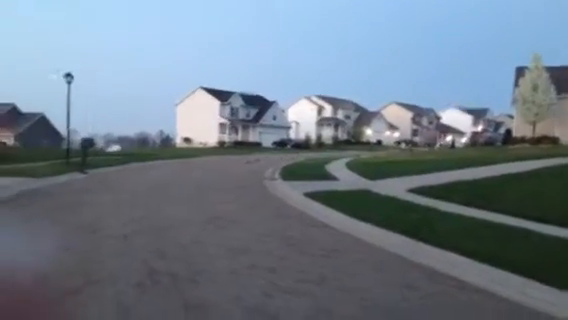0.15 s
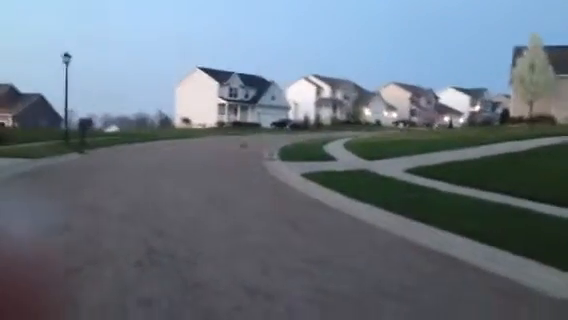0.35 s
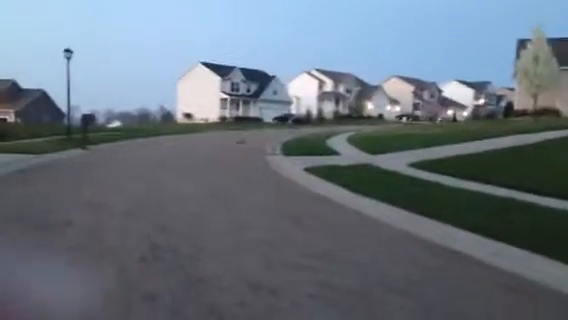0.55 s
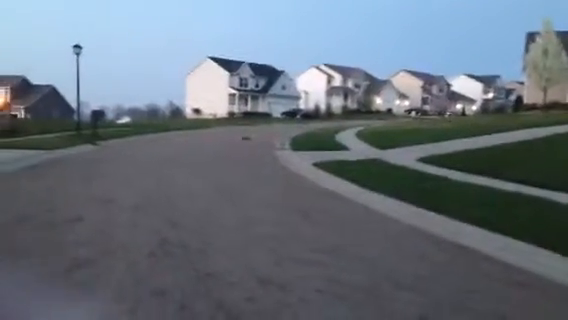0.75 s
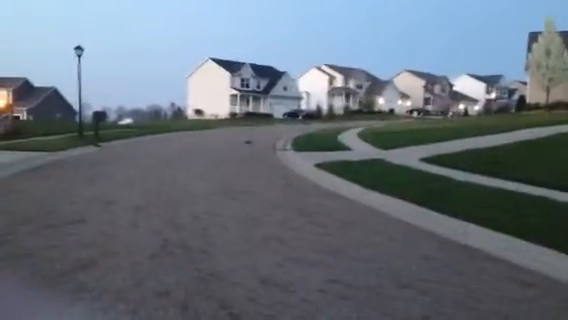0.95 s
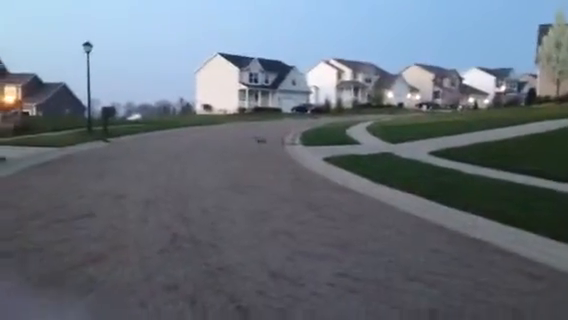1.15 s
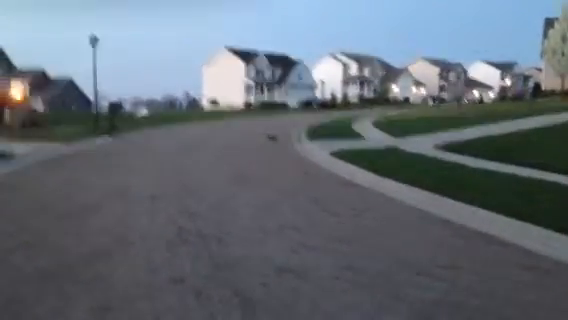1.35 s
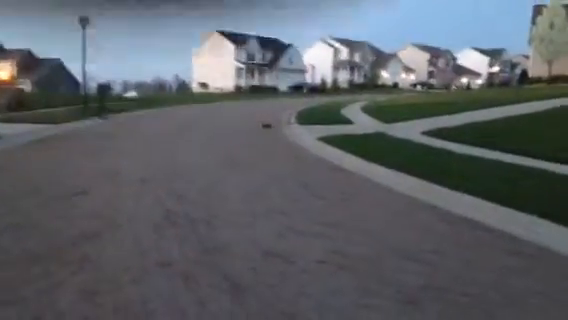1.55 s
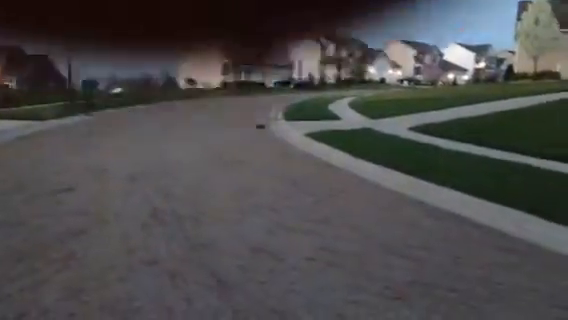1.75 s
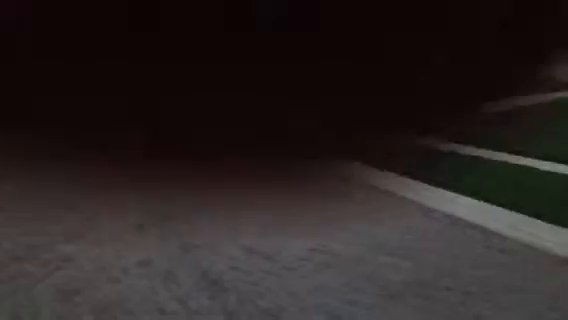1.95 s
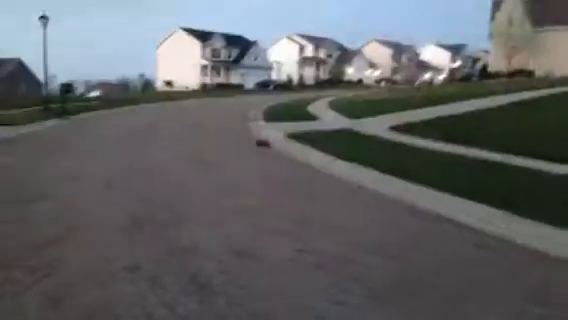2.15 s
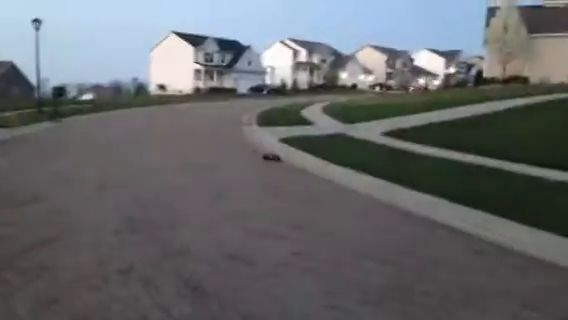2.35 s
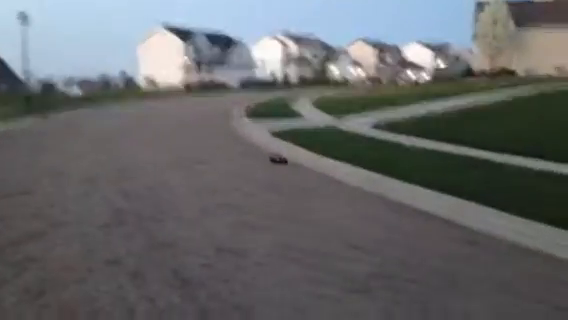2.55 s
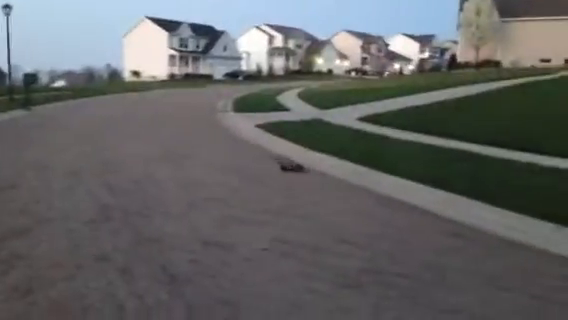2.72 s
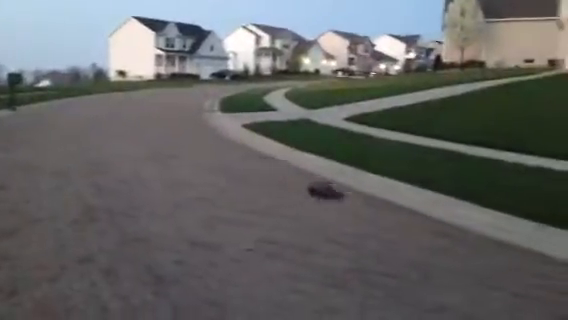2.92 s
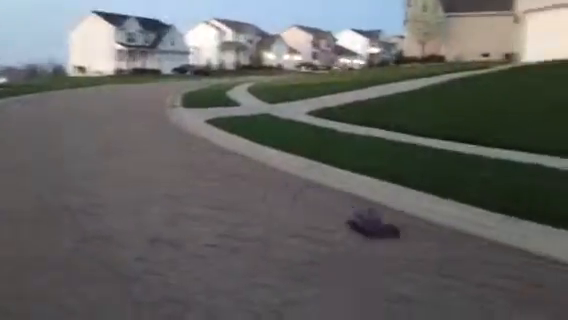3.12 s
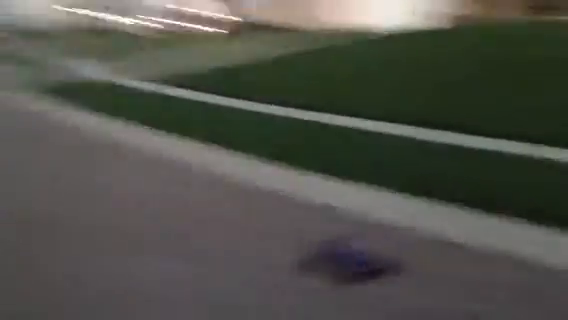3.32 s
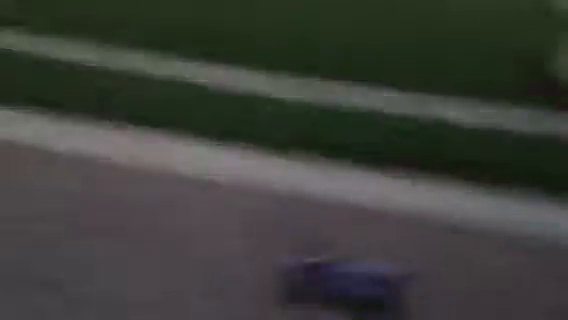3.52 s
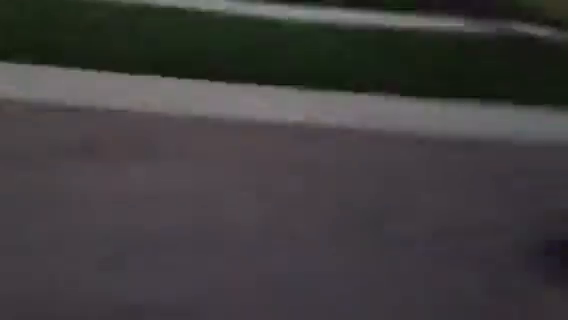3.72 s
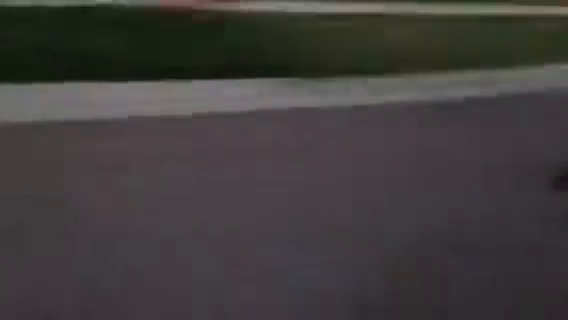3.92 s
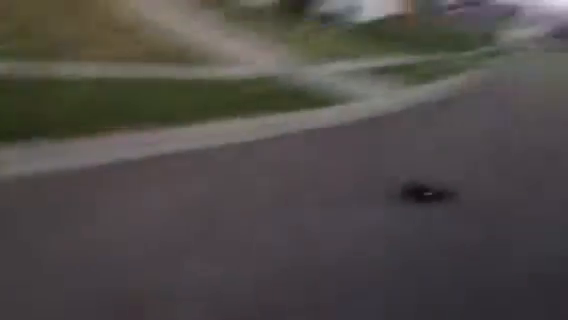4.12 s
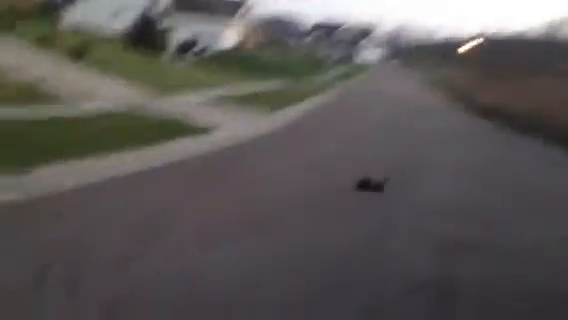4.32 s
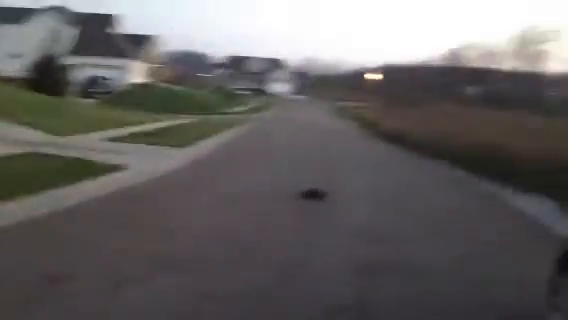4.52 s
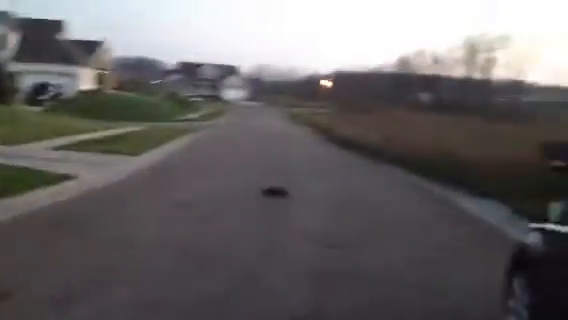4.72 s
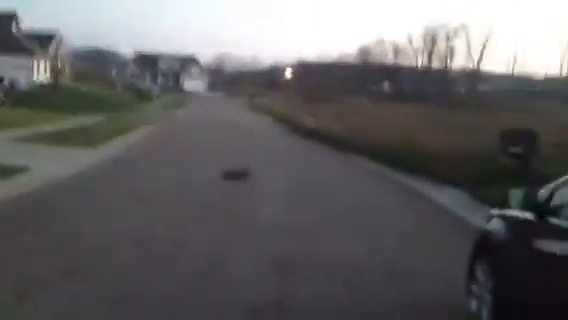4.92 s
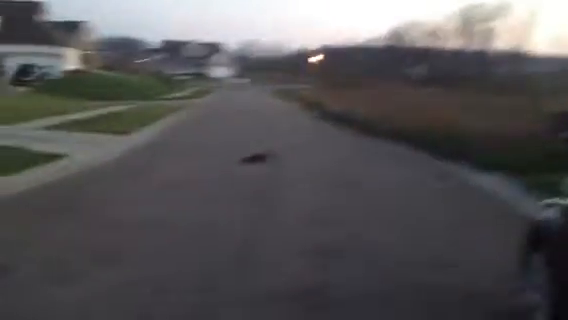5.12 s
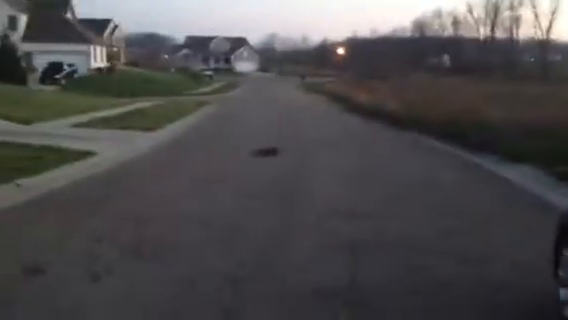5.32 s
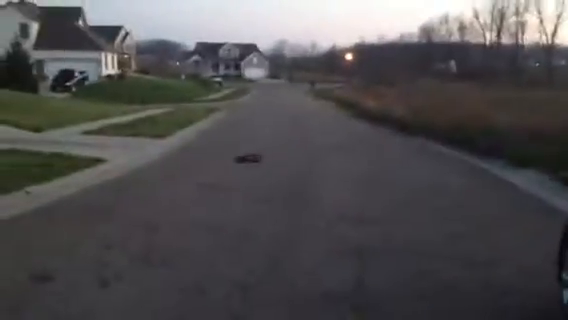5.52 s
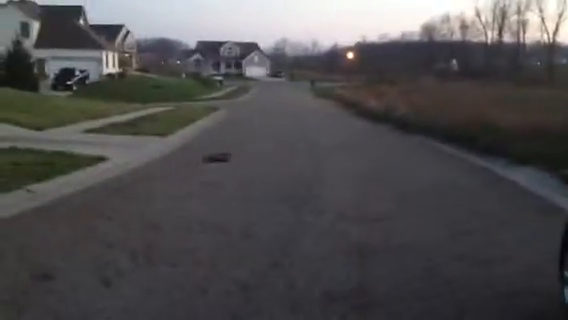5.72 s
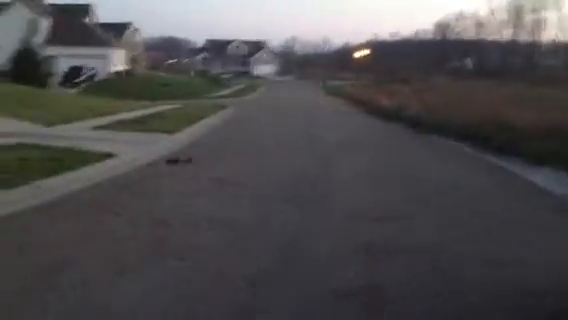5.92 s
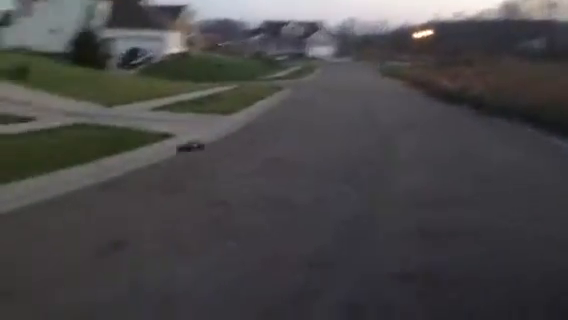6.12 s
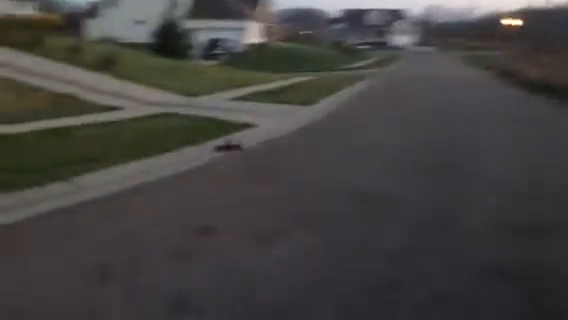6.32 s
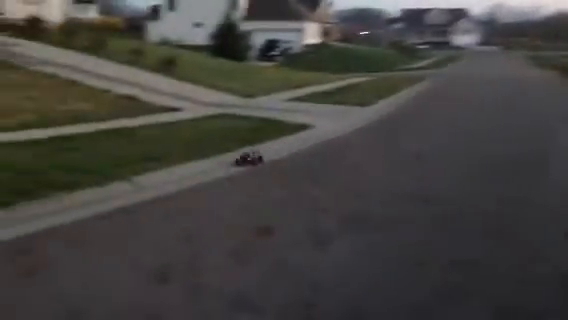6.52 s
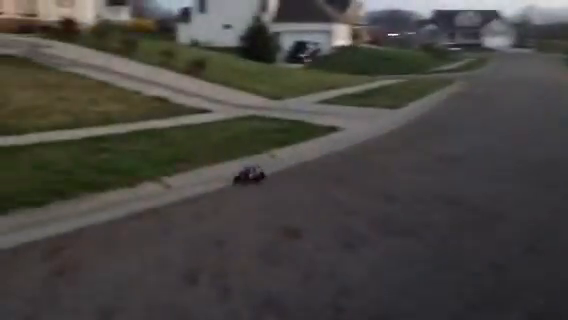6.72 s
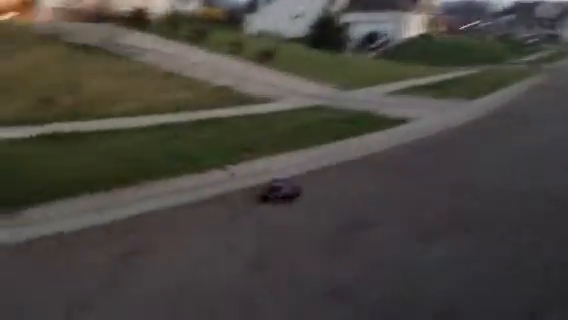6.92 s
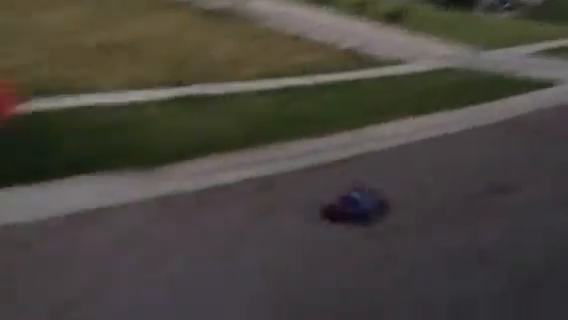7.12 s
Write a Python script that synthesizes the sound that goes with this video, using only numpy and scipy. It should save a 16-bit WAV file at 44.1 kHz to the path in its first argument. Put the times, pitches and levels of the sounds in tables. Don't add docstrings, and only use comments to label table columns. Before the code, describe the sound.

Outdoors on a quiet street, a soft steady hush and a faint low hum, which winds down around 2.3 s. From 0 s a small electric toy truck approaches: a thin, gritty gear buzz with about thirty-five fast knocks a second. Near 1.8-2.25 s a hand cups the microphone, colouring the treble, with small clacks. Buzz, hiss of grit and hollow tyre roar swell to a loud close pass at 3.3-3.9 s, then ease. At 4.3-4.4 s the throttle lifts with sharp clacks; from 4.5 to 5.25 s locked wheels growl in about ten-per-second throbs with bright sand sprays. A near-silent dip at 5.3 s holds tiny ticks. From 5.5 s teeth clack, whine and chirp raggedly, densest at 5.8-6.0 s, with bumps until 6.4 s. A rising whine and tyre roar then rush nearer, loud at the 7.3 s end. Single hand-held microphone, both channels identical.

```python
import sys
import numpy as np
from scipy import signal
from scipy.fft import rfft, irfft
from scipy.io import wavfile
from scipy.ndimage import uniform_filter1d

SR = 44100
rng = np.random.default_rng(int(sys.argv[2]) if len(sys.argv) > 2 else 0)


def generate_wav(signal):
    frames = np.transpose(np.atleast_2d(signal))
    scaled = np.clip(frames, -1, 1) * 32767
    pcm = np.round(scaled).astype(np.int16)
    wavfile.write(sys.argv[1], SR, pcm)


def elevation(decibels):
    levels = np.asarray(decibels, float)
    return 10 ** (levels / 20)


N = 320166

# start_s, roar_db, slide (0-1), roar_hz
TYRES = [(0.0, -61.5, 0.06, 690), (1.2, -56, 0, 770), (2.15, -53, 0.06, 725), (2.77, -48.5, 0.08, 750),
         (3.54, -37, 0.03, 846), (3.82, -38, 0, 950), (4.3, -45, 0.03, 840), (4.41, -44.5, 0.27, 674),
         (4.5, -36, 0.74, 754), (4.97, -36, 0.83, 770), (5.1, -45, 0.8, 710), (5.3, -65, 0.4, 880),
         (5.5, -56.5, 0.04, 710), (5.56, -51, 0, 730), (6.3, -49, 0.07, 800), (6.45, -53, 0.04, 815),
         (7.0, -46.5, 0, 730), (7.26, -37, 0.1, 840)]
# start_s, level_db, speed (0-1), nose_on (0-1), flank_on (0-1)
GEARS = [(0.0, -52.5, 0.93, 0.85, 0.26), (1.3, -49.5, 0.98, 0.73, 0.26), (1.65, -45, 0.87, 0.43, 0.1),
         (2.2, -42, 0.89, 0.25, 0.13), (2.7, -37.5, 0.74, 0.3, 0.9), (3.3, -33.5, 0.97, 0.13, 1),
         (3.6, -33.5, 1, 0.11, 0.03), (4.27, -39, 0.88, 0, 0.24), (4.35, -44.5, 1, 0.1, 0.6),
         (4.5, -33, 0.91, 0.05, 0.46), (4.97, -39.5, 0.35, 0.01, 0.5), (5.27, -60, 0.3, 0.23, 0.34),
         (5.52, -48, 0.1, 0.16, 0), (5.64, -38.5, 0.71, 0.54, 0.2), (6.1, -40.5, 0.82, 0.29, 0.01),
         (6.5, -38, 0.7, 0.27, 0.07), (6.75, -36.5, 0.86, 0.27, 0.5), (7.26, -29, 0.9, 0.3, 0.8)]
# centre_s, treble_change_db, half_length_s
SPRAYS = [
    (4.53, -9, 0.052),
    (4.62, 0, 0.016),
    (4.7, -4, .02),
    (4.762, 6.5, 0.0079),
    (4.825, 8, .012),
    (4.945, 3, .015),
    (5.04, 7, 0.02),
    (5.125, 7, .015),
    (5.57, 2, 0.026),
]


def evened(x):
    return x / np.sqrt(np.mean(x ** 2) + 1e-20)


def ring(x, hz, width):
    turn = np.exp(2j * np.pi * np.cumsum(hz * np.ones(len(x))) / SR)
    r = np.exp(-np.pi * width / SR)
    once = signal.lfilter([1 - r], [1, -r], x / turn)
    twice = signal.lfilter([1 - r], [1, -r], once)
    return 2 * (turn * twice).real


def resonate(x, hz, width):
    return evened(ring(x, hz, width))


def columns(rows, t):
    s, *values = np.transpose(rows)
    at = np.clip(np.interp(t, s, np.arange(len(s))), 0, len(s) - 1 - 1e-9)
    row = at.astype(int)
    return [v[row] + np.diff(v)[row] * (at - row) for v in values]


def bells(rows, t):
    coarse = t[::40]
    swells = sum(db * np.exp(-.5 * ((coarse - s) / half) ** 2) for s, db, half in rows)
    return np.interp(t, coarse, swells)


def wander(per_s, size=N):
    return evened(signal.lfilter(*signal.butter(2, per_s, fs=SR), rng.standard_normal(size)))


def crackle(spread_db):
    return evened(rng.standard_normal(N) * elevation(spread_db * wander(250)))


def street(t):
    # pitch_hz, density_db (dB per Hz)
    hush_rows = [(20, -42), (40, -46), (63, -19.5), (100, -9), (160, 1), (400, -8), (1000, -6),
                 (3000, -14.5), (6000, -25.5), (10500, -22), (15000, -24)]
    hz = np.fft.rfftfreq(N, 1 / SR)
    f, db = np.transpose(hush_rows)
    shape = elevation(np.interp(np.log(hz + 1), np.log(f), db))
    hush = irfft(rfft(rng.standard_normal(N)) * shape, N)
    hum = resonate(rng.standard_normal(N), 162.8, 10.3)
    stops_s, drop_db = 2.3, 23
    hum_db = -60 - drop_db / (1 + np.exp((stops_s - t) / 0.42))
    return elevation(-57) * evened(hush) + elevation(hum_db) * hum


def brake(t):
    # centre_s, dip_db, half_length_s
    releases = [
        (4.57, 2.5, 0.01),
        (4.661, 2.5, 0.01),
        (4.742, 2.5, 0.015),
        (4.82, 5, 0.012),
        (4.915, 5.5, 0.016),
        (5.006, 8, 0.017),
        (5.088, 5, 0.016),
        (5.173, 6, 0.012),
        (5.266, 8, 0.015),
    ]
    return -bells(releases, t)


def knock(t, second=.6):
    # start_s, turns_per_s
    spin_rows = [
        (0, 33.66),
        (.7, 35.47),
        (1.6, 36.5),
        (3.3, 36.67),
        (3.7, 35.0),
        (4.3, 33.51),
    ]
    first_turn, lift_s = .41, 4.3
    slack = wander(10.7)
    turns = first_turn + np.cumsum(columns(spin_rows, t)[0]) / SR + 0.007 * slack
    angle = 2 * np.pi * turns
    tight = 1.5 * np.exp(4.5 * (np.cos(angle) - 1))
    weaker = second * (np.exp(3 * (np.cos(angle + 2.3) - 1)) - .3)
    shape = tight + weaker - .4
    hard_db = 3.5 + 4 * np.exp(-((t - 3.4) / 2.6) ** 2)
    return np.where(t < lift_s, hard_db * shape, 1.56 * slack)


def tyres(t):
    # pitch_hz, half_width_hz
    tyre_rings = [
        (330, 254),
        (1450, 416),
        (2180, 410),
    ]
    # against_roar_db, lost_in_full_slide_db, gain_per_db_farther
    ring_laws = [
        (-4.5, 63, -0.49),
        (1.5, 6, -0.1656),
        (-0.5, 6.5, 0.3267),
    ]
    # centre_s, change_db,
    # half_length_s
    bumps = [
        (5.13, -0.5, 0.027),
        (5.22, 4.5, .02),
        (5.83, -3, .02),
        (5.92, 3, 0.014),
        (6.07, 5.5, 0.035),
        (6.17, 0.5, 0.022),
        (6.28, 4, 0.0059),
        (6.37, 8.5, 0.011),
    ]
    near_db, skid_share = -40, 0.41
    roar_db, slide, roar_hz = columns(TYRES, t)
    drive = crackle(0.89) * elevation(knock(t) / 5 + 1.5 * brake(t))
    skid = np.clip(skid_share * slide, 0, 1)
    rolling = (1 - skid) * resonate(drive, roar_hz, 425)
    growl = 2 * skid * resonate(drive, 0.91 * roar_hz, 260)
    rings = (rolling + growl) * elevation(bells(bumps, t))
    signs = (-1, -1, 1)
    for sign, (hz, half), (db, slide_db, far) in zip(signs, tyre_rings, ring_laws):
        ring_db = db - slide_db * slide + far * (near_db - roar_db)
        rings += sign * elevation(ring_db) * resonate(drive, hz, 2 * half)
    return elevation(roar_db - 1.0) * rings


def rumble(t):
    roar_db, slide, _ = columns(TYRES, t)
    shocks = signal.sosfilt(signal.butter(4, 110, "high", fs=SR, output="sos"), crackle(2.1))
    return elevation(roar_db - 21.5 - 27 * slide) * resonate(shocks, 191, 113)


def part_db(t, index):
    # level_db, nose_on_db, flank_on_db, lost_at_standstill_db
    part_laws = [
        (0.44, -17.5, -1.8, 0.5),
        (-8.5, 10, -2.5, -1.5),
        (3, -10, -21, 14),
        (-2.5, -6.5, 2.5, 37.5),
        (-1, -18.5, -5, 9),
        (-17.5, 17, -26, 29),
    ]
    level_db, speed, nose, flank = columns(GEARS, t)
    db, nose_db, flank_db, still_db = part_laws[index]
    return level_db + db + nose_db * nose + flank_db * flank - still_db * (1 - speed)


def gears(t):
    # start_s, closing_m_per_s
    closing = [
        (0, 19),
        (3.55, 6.5),
        (3.95, -6),
        (4.28, 3),
        (4.4, 9),
        (5.2, -1),
        (6.2, 8),
        (7.26, 16),
    ]
    # pitch_hz, flank_on_shift_hz, standstill_shift_hz
    part_pitches = [
        (4373, -58, 75),
        (7820, 200, -200),
        (10600, 111, 900),
    ]
    half_widths = [590, 710, 1220, 1150]
    second_knock = [
        [0.76],
        [0.5],
        [0.68],
        [0.48],
    ]
    sound_m_per_s, lift_s = 343, 4.3
    *_, speed, _, flank = columns(GEARS, t)
    doppler = 1 + columns(closing, t)[0] / sound_m_per_s
    chassis_hz, shafts_hz, teeth_hz = [(hz + shift * flank + slow * (1 - speed)) * doppler
                                       for hz, shift, slow in part_pitches]
    drive = crackle(0.96)
    beat = knock(t, np.array(second_knock))
    spray_db = bells(SPRAYS, t)
    parts = [(chassis_hz, .45), (6024, .9), (shafts_hz, .35), (teeth_hz, .7)]  # Hz, share of the knock
    rings = 0
    for k, ((hz, share), half) in enumerate(zip(parts, half_widths)):
        blows = np.roll(drive, k // 3 * SR) * elevation(share * beat[k])
        level = elevation(part_db(t, k) + k // 2 * spray_db)
        rings = rings + (-1) ** k * level * resonate(blows, hz, 2 * half)
    for k, tap_db in ((1, 7.5), (3, 3)):
        hz = parts[k][0] * (1 + .045 * wander(60))
        tone = np.cos(2 * np.pi * np.cumsum(hz) / SR)
        tap = elevation(part_db(t, k) + tap_db + 1.95 * (beat[k] - beat[k].max()))
        rings += tap * tone * (t < lift_s)
    return elevation(1.66 * brake(t) - 0.38) * rings


def grit(t):
    db = part_db(t, index=4) + 0.94 * (columns(GEARS, t)[0] + 35)
    level = elevation(db + 1.3 * brake(t) + 0.13 * knock(t) + bells(SPRAYS, t))
    return level * resonate(crackle(2.5), 12900, 4300)


def motor_can(t):
    db = part_db(t, index=5) - 0.75 * (columns(GEARS, t)[0] + 35)
    return elevation(db - 7.5 + 0.52 * brake(t)) * resonate(crackle(1.3), 2894, 540)


def clack(s, peak_db, hz, t60, width):
    t = np.arange(1300) / SR
    burst = rng.standard_normal(len(t)) * elevation(-60 * t / t60) * np.minimum(t / 0.00069, 1)
    rattle = resonate(burst, hz, width)
    return s, elevation(peak_db) * rattle / abs(rattle).max()


def whine(rows):
    t = np.arange(rows[0][0], rows[-1][0], 1 / SR)
    hz, first_db, second_db = columns(rows, t)
    hz = hz * (1 + (.006 + hz / 3e5) * wander(40, len(t)))
    chatter_db = (1 + hz ** 2 / 5e6) * np.minimum(wander(45, len(t)), 1.1)
    first_width, second_width = 80 * (hz.mean() / 2300) ** 2 + 20, hz.mean() ** 2 / 28000
    first = elevation(first_db) * resonate(rng.standard_normal(len(t)), hz, first_width)
    second = elevation(second_db) * resonate(rng.standard_normal(len(t)), 2 * hz, second_width)
    return rows[0][0], elevation(chatter_db) * (first + second) * signal.windows.tukey(len(t), .04)


def chirp(s, peak_db, hz, sweep_hz):
    half_s = 0.0019 * (7000 / hz) ** 0.44
    u = np.linspace(-3, 3, round(6 * half_s * SR))
    ragged = 1 + .3 * evened(uniform_filter1d(rng.standard_normal(4000), size=30))[:len(u)]
    tone = np.sin(2 * np.pi * np.cumsum(hz + sweep_hz * u / 3) / SR)
    return s - 3 * half_s, elevation(peak_db - 1.5) * np.exp(-.5 * u ** 2) * ragged * tone


def add(mix, s, sound):
    part = mix[round(s * SR):][:len(sound)]
    part += sound[:len(part)]


def scatter(x):
    _, _, z = signal.stft(x, SR, nperseg=1024, noverlap=768)
    streaks = uniform_filter1d(rng.standard_normal(z.shape), size=4, axis=0)
    streaks = uniform_filter1d(uniform_filter1d(streaks, size=20, axis=1), size=12, axis=1)
    streaked = z * elevation(2.2 * evened(streaks) - .6)
    return signal.istft(streaked, SR, nperseg=1024, noverlap=768)[1][:N]


def path(truck, around, t):
    # start_s, end_s, from_hz, to_hz, depth
    notches = [(-.3, 1.5, 4120, 3950, .38), (6.65, 7.5, 4600, 5150, -.4), (6.25, 6.32, 4250, 4250, -.7),
               (6.335, 6.39, 4200, 4200, -.5), (3.1, 3.95, 4750, 4450, -.6), (3.45, 4.05, 1000, 1120, -.5),
               (1.3, 1.7, 3950, 3250, .45), (3.3, 3.85, 2150, 2780, .85), (3.95, 4.4, 2250, 2350, .5),
               (3.0, 3.7, 3250, 2900, .4), (4.8, 5.1, 1750, 1900, .5), (5.0, 5.28, 2100, 2200, .6),
               (5.05, 5.3, 4600, 5200, -.4), (5.05, 5.45, 3550, 3580, .45), (4.9, 5.3, 2600, 2620, .4),
               (5.2, 5.45, 1350, 1400, .55), (-.3, 1.7, 4970, 4980, .42), (1.6, 2.55, 4960, 4950, .72),
               (2.5, 3.2, 4990, 5050, .3), (5.15, 5.6, 5000, 4950, .4), (5.5, 6.4, 4950, 4950, .22),
               (6.4, 6.9, 5050, 5080, .38), (5.08, 5.27, 1250, 1120, -.9), (4.4, 4.65, 2200, 2150, -.5),
               (3.05, 3.6, 11300, 10900, -.25), (5.77, 5.9, 8900, 7900, .7), (6.25, 7.4, 10850, 9950, .55),
               (5.1, 5.55, 9050, 8900, .45), (3.35, 4.35, 6520, 6200, .55), (1.3, 1.66, 7350, 8800, .75),
               (1.55, 1.95, 8650, 8700, .5), (4.35, 6.1, 7500, 8250, .45), (-.3, 1.5, 9600, 9600, .45),
               (2.25, 2.62, 12100, 10100, .8), (2.45, 3.45, 10000, 9200, .65),
               (4.85, 5.55, 10200, 10700, .62), (3.5, 3.95, 11950, 12500, .75),
               (3.8, 4.2, 12100, 11900, .5), (5.5, 6.25, 11700, 13400, .8)]
    # start_s, end_s, gain_db, cup_hz
    hand = (1.8, 2.26, 3, 3500)
    truck = signal.sosfilt(signal.butter(3, 230, "high", fs=SR, output="sos"), truck) + around
    drift = 1 + wander(12.0) / 200
    flicker = 1 + .13 * wander(7)
    for start, end, from_hz, to_hz, depth in notches:
        on = (t > start) & (t < end)
        u = (t[on] - start) / (end - start)
        hz = (from_hz + (to_hz - from_hz) * u) * drift[on]
        fade = np.minimum(5 * np.minimum(u, 1 - u), 1)
        share = np.clip(depth * flicker[on], -1, .85) * fade
        truck[on] -= share * ring(truck[on], hz, .14 * from_hz)
    start, end, gain_db, cup_hz = hand
    cupped = np.clip((t - start) / 0.19, 0, 1) * np.clip((end - t) / 0.018, 0, 1)
    treble = signal.sosfilt(signal.butter(2, 2600, "high", fs=SR, output="sos"), truck)
    return truck + cupped * ((elevation(gain_db) - 1) * treble + 1.6 * ring(truck, cup_hz, 1240))


def scene():
    # start_s, peak_db, pitch_hz
    clacks = [(2.1186, -54, 3770), (2.201, -30, 6300), (2.2832, -31, 5860), (4.2943, -28, 4370),
              (4.378, -32.5, 4360), (4.4054, -43, 4290), (4.4228, -20.5, 4680), (4.756, -24.5, 4450),
              (5.1976, -50, 4450), (5.3218, -44, 5500), (5.3564, -51, 4600), (5.536, -34, 4700),
              (5.638, -23.5, 6340), (6.311, -26, 6540), (6.3288, -30, 4370)]
    # start_s, pitch_hz, whine_db, second_partial_db
    whines = [
        [(4.45, 3670, -64, -42), (4.48, 2860, -52, -38.5), (4.53, 2270, -45, -41), (4.56, 2120, -70, -42)],
        [(5.32, 987, -72, -54), (5.37, 1042, -54, -58), (5.43, 1070, -58, -66)],
        [(5.42, 1370, -64, -72), (5.46, 1430, -55, -72), (5.49, 1670, -46, -71), (5.535, 1607, -47, -67)],
        [(5.532, 2290, -45, -41), (5.6, 2230, -50, -42), (5.64, 2280, -49, -66)],
        [(5.625, 2860, -73, -60), (5.72, 3200, -46, -44), (5.77, 3280, -51, -39), (5.81, 3440, -55, -35),
         (5.84, 3500, -58, -37), (5.88, 3560, -52, -43), (5.99, 3640, -59, -41)],
        [(5.1, 3170, -70, -80), (5.2, 3250, -78, -80), (5.3, 3320, -68, -80)],
        [(5.08, 3000, -71, -80), (5.2, 3000, -68, -80), (5.31, 3000, -69, -80)],
        [(5.63, 2180, -54, -60), (5.7, 2106, -44.5, -58), (5.82, 2100, -54, -58)],
        [(5.835, 1800, -53, -53), (5.87, 1850, -41, -51), (5.9, 1980, -49, -54)],
        [(6.25, 2180, -62, -60), (6.29, 2180, -60, -55), (6.34, 2150, -62, -55)],
        [(6.0, 3200, -73, -44), (6.2, 3380, -75, -46), (6.33, 3800, -59, -58), (6.43, 4280, -48, -43),
         (6.5, 4100, -51, -52), (6.62, 4350, -78, -57)],
        [(5.9, 2020, -61, -49), (5.98, 2090, -50, -48.5), (6.06, 2060, -50, -61)],
        [(6.22, 1990, -75, -71), (6.42, 2147, -50, -43.5), (6.7, 2420, -53, -47), (7.1, 2580, -42, -40.5),
         (7.26, 2740, -53, -34)],
    ]
    # start_s, peak_db, pitch_hz
    ticks = [
        (5.1706, -47, 12700),
        (5.219, -42, 12700),
        (5.2525, -49, 13400),
        (5.2879, -42, 14200),
        (5.3023, -46, 13500),
    ]
    # centre_s, peak_db, pitch_hz, sweep_hz
    chirps = [(5.556, -35, 4430, -200), (5.591, -34.5, 2170, -100), (5.696, -31, 6330, 600),
              (5.711, -33, 6800, -500), (5.727, -32, 6700, 400), (5.751, -35, 7200, 300),
              (5.768, -40, 6600, -300), (5.78, -35, 6960, -900), (5.808, -30, 6800, -600),
              (5.824, -26, 7000, -300), (5.834, -29, 6640, -600), (5.842, -31, 6570, 500),
              (5.853, -32, 7150, 300), (5.874, -30, 7000, 300), (5.883, -25, 6900, -900),
              (5.897, -25, 7040, 500), (5.91, -35, 7440, -600), (5.922, -29, 6900, -300),
              (5.935, -24, 7180, 300), (5.948, -30, 7070, 200), (5.963, -26, 6800, -700),
              (5.978, -29, 4370, -200), (6.005, -35, 6300, -300), (6.003, -35, 4300, 100),
              (6.118, -34, 6600, 200), (6.15, -34, 6600, 300), (6.192, -29, 7080, 300),
              (6.204, -31, 7000, -400), (6.243, -44, 6450, 0), (6.516, -37, 8400, -200),
              (6.33, -28, 7100, -900), (6.428, -40, 8600, 400), (6.47, -38, 8400, -300),
              (6.485, -36, 8000, -500), (6.742, -39, 6800, 600), (5.75, -39, 805, -38),
              (5.917, -40, 753, 28), (6.179, -38, 1275, 20), (6.18, -39, 830, 20), (6.285, -33.5, 787, -28),
              (6.01, -37, 2070, 40), (6.068, -42.5, 3770, -100), (6.274, -40, 4270, 100),
              (6.298, -40, 4270, -100), (6.364, -35.5, 4200, 100), (6.415, -36, 4060, 300),
              (6.44, -32, 4770, 100), (6.52, -30, 4770, 200)]
    t = np.arange(N) / SR
    truck = scatter(tyres(t) + gears(t) + grit(t) + motor_can(t))
    for row in clacks:
        add(truck, *clack(*row, t60=0.032, width=760))
    for rows in whines:
        add(truck, *whine(rows))
    for row in ticks:
        add(truck, *clack(*row, t60=0.023, width=13000))
    for row in chirps:
        add(truck, *chirp(*row))
    mix = path(truck, street(t), t) + rumble(t)
    return np.array([mix, mix])


def case(x):
    # pitch_hz, sharpness, share_added
    case_rows = [
        (1100, 7.5, -0.3),
        (3200, 5.3, 0.66),
        (3730, 11.3, 1),
        (4600, 116, 0.13),
        (1740, 4.2, -0.37),
    ]
    for hz, sharp, share in case_rows:
        x = x + share * signal.lfilter(*signal.iirpeak(hz, sharp, SR), x)
    return x


def thin_bands(x):
    # start_s, end_s, edge_hz
    narrowed = [(0, 1.4, 13300), (1.4, 2.05, 14500), (2.25, 2.56, 13700), (3.47, 4.16, 14050),
                (4.16, 4.3, 14600), (4.3, 4.62, 13900), (4.62, 5.1, 14250), (5.55, 5.85, 14900),
                (6.3, 7.0, 14750)]
    hz, t, z = signal.stft(x, SR, nperseg=1024, noverlap=768)
    hz = hz[:, None]
    chance = rng.standard_normal((65, len(t) // 6 + 1)).repeat(8, 0).repeat(6, 1)[:len(hz), :len(t)]
    edge_hz = 15600 - sum((15600 - f) * (t >= a) * (t < b) for a, b, f in narrowed)
    ragged_hz = (130 + 350 * (t < 2.6)) * chance * abs(chance)
    keep = hz < np.minimum(uniform_filter1d(edge_hz, size=24) - 50 + ragged_hz, 15450)
    keep |= (abs(hz - 15250) < 110) & (chance[-1] > -.1) & (abs(t - 4.87) > .19)
    power = uniform_filter1d(abs(z) ** 2, size=12, axis=1)
    around = uniform_filter1d(power, size=30, axis=0)
    weak = uniform_filter1d(power, size=2, axis=0) < elevation(-16.5 + hz / 4000 + 1.5 * chance) * around
    keep &= ~weak | (hz < 3500)
    return signal.istft(z * np.maximum(keep, 1e-3), SR, nperseg=1024, noverlap=768)[1][:N]


def band_limit(x):
    return signal.sosfilt(signal.butter(12, 15680, fs=SR, output="sos"), x)


def record(dry):
    x = thin_bands(case(dry[0]))
    return band_limit(np.array([x, x]))


dry = scene()
out = record(dry)
generate_wav(out)
```